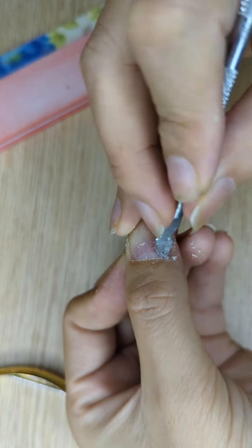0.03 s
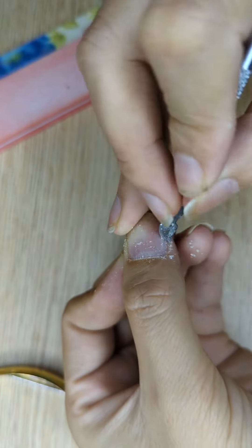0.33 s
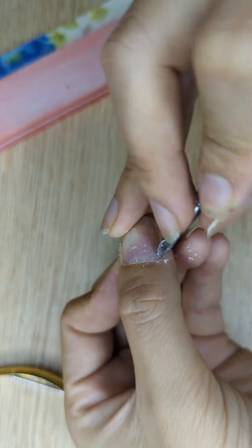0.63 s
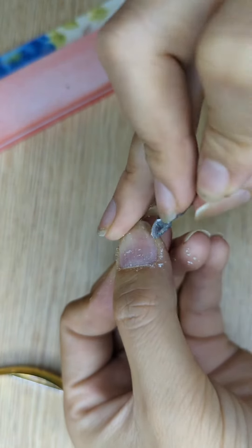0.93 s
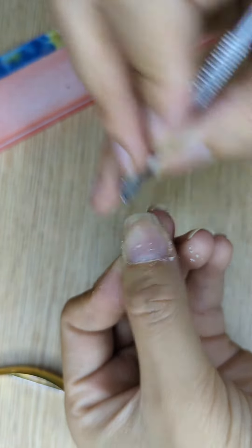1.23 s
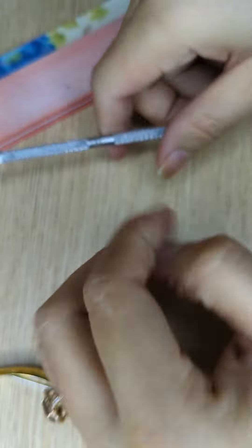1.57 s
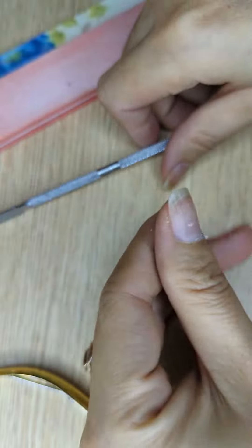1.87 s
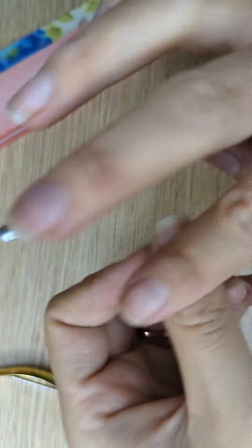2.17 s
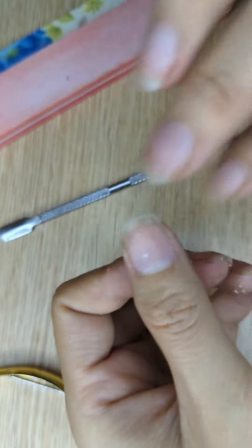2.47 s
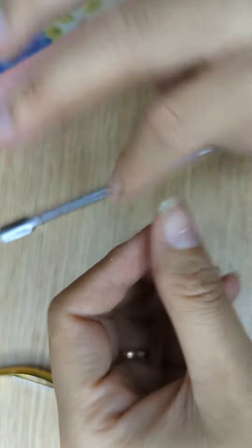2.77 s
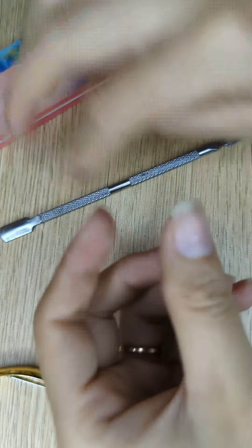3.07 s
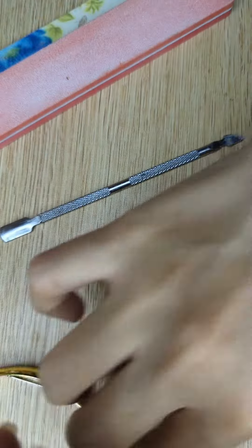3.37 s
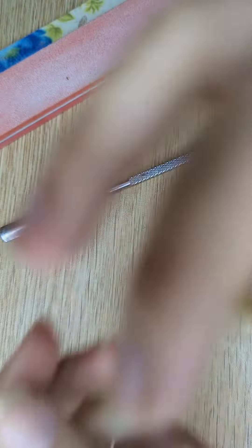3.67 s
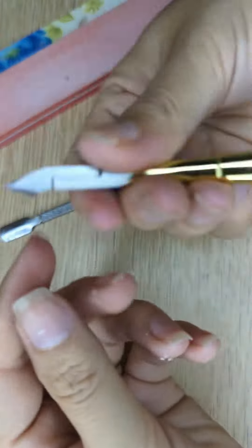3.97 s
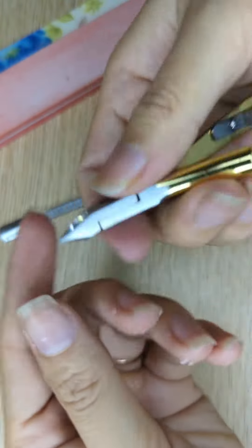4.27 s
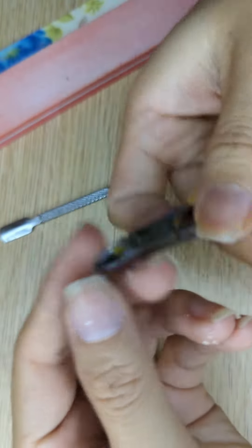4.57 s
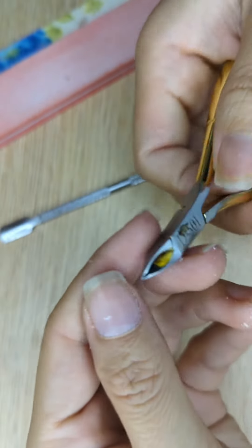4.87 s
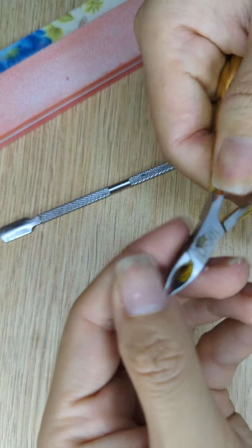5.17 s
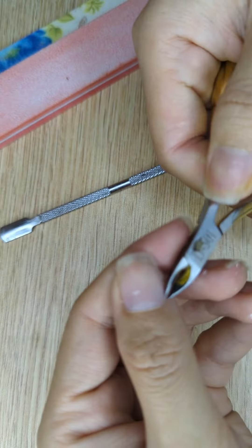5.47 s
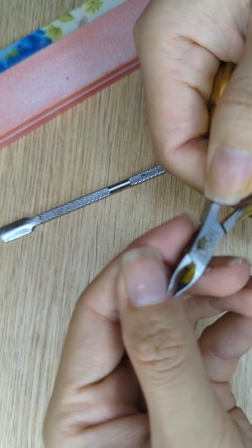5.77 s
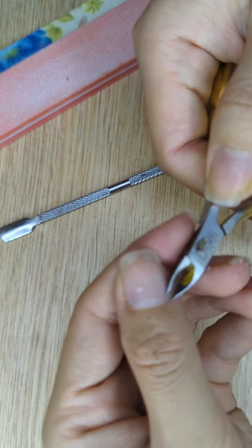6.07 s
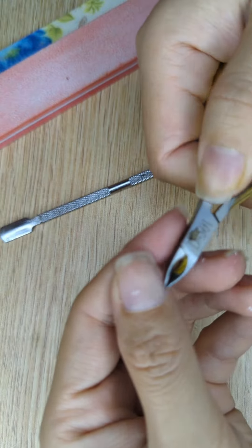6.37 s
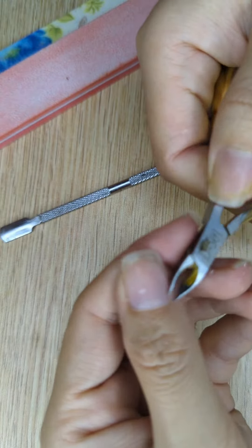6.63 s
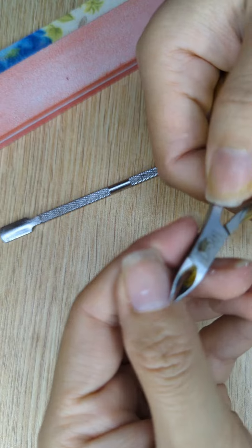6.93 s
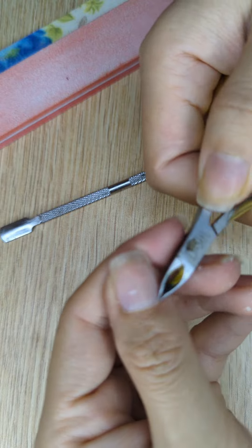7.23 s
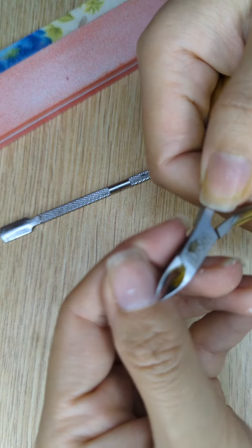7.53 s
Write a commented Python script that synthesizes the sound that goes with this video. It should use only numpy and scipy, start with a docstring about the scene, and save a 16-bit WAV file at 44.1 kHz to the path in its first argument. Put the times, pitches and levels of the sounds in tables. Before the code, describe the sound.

A metal manicure tool scrapes faintly, clatters onto a wooden table, then nippers drag and clink, close by in a quiet room.

```python
"""Faint, short scrapes, close by: a steel pusher works a thumbnail in a manicure at a wooden table.
Put down, the pusher knocks the board and chatters to rest, ringing. Fingertips flick the dust away.
Cuticle nippers are dragged off the table in stick-slip, then shift in the hand with a bright clink.
A low hum, faint far tones and the rumble of a small room lie underneath."""
import sys
import numpy as np
from scipy import signal
from scipy.fft import rfft, irfft, next_fast_len
from scipy.io import wavfile
from scipy.ndimage import uniform_filter1d, map_coordinates

SR = 44100
rng = np.random.default_rng(int(sys.argv[2]) if len(sys.argv) > 2 else 0)


def wav_record(signal):
    """Record a signal, one row per channel, as 16-bit PCM in the file named by sys.argv[1]."""
    frames = np.transpose(np.atleast_2d(signal))
    bounded = np.clip(frames, -1, 1)
    # unit amplitude maps onto the largest positive 16-bit level
    quanta = np.round(bounded * 32767).astype(np.int16)
    wavfile.write(sys.argv[1], SR, quanta)


N = 335160
TIME = np.arange(N) / SR
AGE = TIME[:SR // 4]  # s since a contact

# tool blows on the table, the pusher rocking end to end: start_s, knock_db, board_db, steel_db
TABLE_BLOWS = [(1.452, -45, -54, -79), (1.8704, -17.5, -26.5, -54), (2.0071, -11, -23, -48.5),
               (2.0252, -27, -30.5, -24), (2.034, -17.5, -27, -23), (2.0421, -25, -34, -28.5),
               (2.0473, -27, -38, -27), (2.0523, -24, -32, -29), (2.059, -23, -29, -28),
               (2.07, -25.5, -29.5, -35.5), (2.0782, -28, -30.5, -43.5), (2.0865, -32, -33.5, -38.5),
               (2.091, -35, -39.5, -41.5), (2.1, -36, -38, -47), (2.108, -41, -47, -51.5)]
# left-right likeness of near sounds: freq_hz, correlation
NEAR_LIKENESS = [(100, 1), (250, 0.9), (550, 0.48), (1200, -0.5), (4000, -0.092), (10000, 0.0018)]


def nail_scrapes():
    """The pusher rasps on the nail; its blade sings as it presses harder."""
    scrapes = [(0.087, .014, -72, -76), (.174, 0.011, -71.5, -79), (.279, 0.015, -72.5, -82),
               (0.368, .008, -68.5, -79), (0.482, 0.013, -67.5, -80), (.579, 0.011, -76, -77),
               (0.894, .022, -73, -77), (1.087, 0.019, -69, -64), (1.142, 0.025, -67, -63),
               (1.23, 0.017, -56.5, -59)]  # centre_s, length_s, rasp_db, blade_db
    rasp_spectrum = [(1500, -6), (4000, -4), (7500, -6), (9100, -3.5), (10300, -5), (12400, 3), (13800, -5),
                     (16000, -6)]  # freq_hz, level_db
    blade_spectrum = [(8000, -33.5), (9100, -15), (10200, -34.5), (11500, -10.5), (12300, -21), (13000, 0),
                      (13800, -24.5), (16000, -34)]  # freq_hz, level_db
    rasp = strokes([(s, length, db) for s, length, db, _ in scrapes], rasp_spectrum, grain_db=3, edge=5)
    blade_strokes = [(s, length, db) for s, length, _, db in scrapes]
    return rasp + strokes(blade_strokes, blade_spectrum, grain_db=1, edge=9)


def table_blows(buzz_db=-2.5):
    """Each blow knocks the wood and rings board and pusher; the steel buzzes while it touches."""
    board_modes = [(146, -7.5, 0.25), (215, 0, .12), (249, 3.5, 0.097), (360.6, -7, 0.095),
                   (588.3, -4.5, .14), (708.6, 2, 0.082), (956, -11, 0.14), (1100, -16, .06),
                   (1389, -4.5, .075), (1990, 0, .075), (2354, -9.5, 0.09), (2720, -10.5, 0.079),
                   (3080, -11, 0.098), (4490, -13.5, .09)]  # pitch_hz, level_db, t60_s
    tip_modes = [(1427, -4, .03), (1960, -2, 0.027), (2400, -0.5, 0.046), (2730, -1, .055), (3180, -4, .03),
                 (4307, -5, 0.034)]  # pitch_hz, level_db, t60_s
    tip_rebounds = [(1.8707, -21), (1.8764, -26.5), (2.0085, -15), (2.0123, -19.5)]  # start_s, level_db
    knock_spectrum = [(40, -30), (100, -5.5), (180, 1.5), (280, 0), (450, 0), (900, 0.5), (1400, 2.5),
                      (1650, -7), (2000, 0.5), (2900, -1), (3700, -9), (4700, -10), (5700, -17.5),
                      (12000, -29), (15000, -49)]  # freq_hz, level_db
    buzz_spectrum = [(2500, -26), (4500, -6), (6300, 3.5), (7500, -4.5), (10000, -8), (13000, -10.5),
                     (14500, -42)]  # freq_hz, level_db
    rings, knock_power, buzz_power = np.zeros((2, N)), np.zeros(N), np.zeros(N)
    for s, knock_db, board_db, steel_db in TABLE_BLOWS:
        add(knock_power, s, (amp(knock_db) * contact(hold_s=.003, t60_s=.036, attack_s=.0004)) ** 2)
        touch = amp(steel_db + buzz_db) * contact(hold_s=.002, t60_s=.04, attack_s=.0005)
        add(buzz_power, s, touch ** 2)
        add(rings, s, amp(board_db) * ring(board_modes, blur_hz=40.07))
    for s, db in tip_rebounds:
        add(rings, s, amp(db) * ring(tip_modes, blur_hz=40))
    knock = np.sqrt(knock_power) * noise(knock_spectrum)
    steel = pusher_ring(blur_hz=18)
    buzz = np.sqrt(buzz_power) * friction(buzz_spectrum, grain_db=2)
    return rings + steel + knock + buzz


def pusher_ring(blur_hz):
    """Each mode of the steel rod stores the energy of successive blows and sings between them."""
    modes = [(3720, -5.5, .11), (5930, -15, .1), (6175, -13, .11), (7084, -14, .1), (9260, -17.5, 0.083),
             (11260, -1, 0.055), (12230, -11.5, .065), (12860, -3, 0.041), (14700, -18, .02)]  # pitch_hz, level_db, t60_s
    out = np.zeros((2, N))
    channel_phase = np.array([[0], [np.pi / 2]])
    for hz, db, t60_s in modes:
        energy = np.zeros(N)
        for s, _, _, steel_db in TABLE_BLOWS:
            add(energy, s, (amp(db + steel_db) * contact(hold_s=0, t60_s=t60_s, attack_s=.0008)) ** 2)
        walk = np.cumsum(uniform_filter1d(rng.standard_normal(N), size=64))
        drift = walk * np.sqrt(2 * np.pi * blur_hz / SR)
        out += np.sqrt(energy) * np.sin(2 * np.pi * hz * TIME + drift + channel_phase)
    return out


def nipper_drag(start_s=3.418, end_s=3.531, slip_hz=(300.9, 155.3), jitter=.3, roughness=1.5):
    """Steel sticks and slips on the grain; slowing slips drive the tabletop, catches grind harder."""
    table_modes = [(162.3, 46, -13.5, -0.5), (290.5, 43, 5, 4), (536, 100, -8, -2), (690, 60, 2.5, 4.5),
                   (810, 45, 4, -6.5), (912, 35, 2.5, -4.5), (1137, 110, -7, -5), (1930, 150, -26, -9.5)]  # pitch_hz, width_hz, start_db, end_db
    catches = [(3.43, 0.012, -35.5), (3.501, 0.016, -33), (3.53, 0.011, -40)]  # centre_s, length_s, level_db
    grit_spectrum = [(500, -26.5), (1300, 2.5), (2000, 0), (3200, -8), (6500, -14), (9000, -15),
                     (15500, -22.5)]  # freq_hz, level_db
    pull_db, grit_db, catch_drive_db = -25.5, -47, 2
    pull = held(start_s, end_s, attack_s=.0145, release_s=.1)
    catch = pull * sum(amp(db) * swell(s, length, edge=3.8) for s, length, db in catches)
    rate_hz = np.interp(TIME, [start_s, end_s], slip_hz)
    cycles = np.cumsum(rate_hz * np.exp(jitter * wobble(250))) / SR
    slips = unit(np.diff(np.floor(cycles), prepend=0) * amp(2.8 * wobble(200)))
    force = slips + roughness * noise([(200, -3.5), (700, 1.5)])
    travel = np.interp(TIME, [start_s, end_s], [0, 1])  # the moving contact shifts the mode balance
    first = resonate(force, [(hz, width, db) for hz, width, db, _ in table_modes])
    last = resonate(force, [(hz, width, db) for hz, width, _, db in table_modes])
    tabletop = ((1 - travel) * first + travel * last) * amp([[-.9], [.9]])
    after_slip = np.exp(-.7 * (cycles % 1))
    grit = unit(friction(grit_spectrum, grain_db=-.5) * after_slip)
    slide = held(start_s, end_s, attack_s=.0092, release_s=.17)  # grit outlasts the pull
    drive = amp(pull_db) * pull + amp(catch_drive_db) * catch
    return drive * tabletop + (amp(grit_db) * slide + catch) * grit


def steel_clicks(mute_after_s=.012, mute_t60_s=.042):
    """Hard contacts give a bright tick and a dull snap; the steel rings until fingers mute it."""
    clicks = [(1.295, -57, -57.5, -84), (1.7895, -45.5, -53.5, -72), (1.8702, -37.5, -30, -54),
              (2.007, -31, -26.5, -52.5), (3.195, -57, -59.5, -78), (3.38, -73, -58, -85),
              (3.8213, -26, -37, -36), (3.8239, -15.5, -37.5, -37.5), (3.8293, -29.5, -48.5, -28),
              (3.843, -29, -59.5, -39), (3.8516, -34, -42, -43.5), (4.0935, -39, -51.5, -57),
              (4.1, -41, -59, -67), (4.3071, -54.5, -61, -72), (4.58, -51, -42, -61)]  # start_s, tick_db, snap_db, ring_db
    nipper_modes = [(1520, -21, .06), (1900, -22, .07), (3080, -14, 0.09), (4330, -16, 0.049),
                    (7370, -4, .058), (8640, 1, 0.065), (10400, -11.5, 0.054), (11300, -7.5, .049),
                    (12060, -5, .06), (14300, 2, .11), (14690, -5, .07), (15450, 1.5, .07)]  # pitch_hz, level_db, t60_s
    tick_spectrum = [(600, -53.5), (1500, -13.5), (3200, -14.5), (6200, -14), (8500, -3), (12500, 2),
                     (14500, -1.5), (16500, 0)]  # freq_hz, level_db
    snap_spectrum = [(950, -28), (1500, -0.5), (3000, 1), (5200, -3), (8000, -11), (16000, -20)]  # freq_hz, level_db
    rings, tick_power, snap_power = np.zeros((2, N)), np.zeros(N), np.zeros(N)
    touch = contact(hold_s=.0017, t60_s=.023, attack_s=.0005)
    muting = fade(np.maximum(AGE - mute_after_s, 0), mute_t60_s)
    for s, tick_db, snap_db, ring_db in clicks:
        add(tick_power, s, (amp(tick_db) * touch) ** 2)
        add(snap_power, s, (amp(snap_db) * touch) ** 2)
        add(rings, s, amp(ring_db) * muting * ring(nipper_modes, blur_hz=44.65))
    ticks = np.sqrt(tick_power) * noise(tick_spectrum)
    snaps = np.sqrt(snap_power) * noise(snap_spectrum)
    return rings + ticks + snaps


def steel_skids(bite_s=3.429, bite_length_s=.016, bite_db=-38):
    """Steel tips skid over the wood; the nipper jaws grate as they first bite in."""
    skids = [(1.9, 0.012, -44.5), (1.93, 0.028, -56), (3.505, 0.043, -37)]  # centre_s, length_s, level_db
    skid_spectrum = [(1000, -15), (1600, -11), (1950, 0), (2250, -3.5), (2800, 2), (3500, -17),
                     (4250, -8.5), (5700, -22.5), (6350, -11), (7200, -25), (12000, -32)]  # freq_hz, level_db
    jaw_spectrum = [(2600, -21.5), (3350, -6), (3550, 4), (3780, -11), (4000, -2), (4400, -8), (5100, -18),
                    (7000, -27), (14000, -18)]  # freq_hz, level_db
    tips = strokes(skids, skid_spectrum, grain_db=2, edge=4.7)
    return tips + strokes([(bite_s, bite_length_s, bite_db)], jaw_spectrum, grain_db=2, edge=10)


def hand_bumps(low_hz=141.6, high_hz=226, t60_s=.046):
    """A soft hand moves only the table's lowest modes."""
    bumps = [(1.222, -41), (1.456, -37.5), (1.986, -42.5), (3.381, -30), (3.4, -38), (3.561, -36),
             (4.585, -26), (4.602, -34.5)]  # start_s, level_db
    out = np.zeros(N)
    modes = np.sin(2 * np.pi * low_hz * AGE) + .73 * np.sin(2 * np.pi * high_hz * AGE)
    for s, db in bumps:
        add(out, s, -amp(db) * modes * fade(AGE, t60_s))
    return out


def finger_flicks(flick_s=.022, snag_s=.0033, ridge_db=4):
    """Fingertips flick dust off the nail; skin ridges catch in turn, and the nail's edge snags."""
    flicks = [(2.271, -59.5), (2.418, -55.5), (2.594, -53.5), (2.756, -54), (2.89, -56.5), (3.048, -50.5)]  # centre_s, level_db
    snags = [(2.889, -49), (3.055, -44)]  # centre_s, level_db
    skin_spectrum = [(2000, -20.5), (5000, -16), (9000, -13), (10800, -9.5), (12100, -2.5), (13500, -6.5),
                     (15200, -6), (16500, -19.5)]  # freq_hz, level_db
    ridges = unit(amp(ridge_db * wobble(1800)))
    wiping = strokes([(s, flick_s, db) for s, db in flicks], skin_spectrum, grain_db=0, edge=6.9)
    snagging = strokes([(s, snag_s, db) for s, db in snags], skin_spectrum, grain_db=-.5, edge=5)
    return ridges * wiping + snagging


def handling(start_s=1.85, end_s=4.5, rustle_db=-79, arms_db=-58):
    """Skin slides on the handles, hands brush and rustle, forearms rumble on the table."""
    handle_rubs = [(1.57, 0.023, -72), (2.155, 0.022, -66.5), (3.25, 0.058, -68), (4.032, 0.06, -58.5),
                   (4.183, 0.043, -66.5), (4.239, 0.021, -57.5), (4.599, 0.024, -54), (4.65, 0.057, -62.5)]  # centre_s, length_s, level_db
    palm_brushes = [(1.215, 0.073, -56.5), (2.54, 0.092, -54), (2.76, 0.0592, -56), (2.97, 0.078, -61.5),
                    (3.95, 0.095, -61.5), (4.685, .019, -53.5), (6.71, .04, -64)]  # centre_s, length_s, level_db
    grip_spectrum = [(1200, -8.5), (4000, 0), (7000, -4.5), (10000, -2.5), (15500, -8)]  # freq_hz, level_db
    palm_spectrum = [(200, -4.5), (600, 17), (2100, 12), (4000, -6), (12000, -36)]  # freq_hz, level_db
    arm_spectrum = [(20, -5), (35, 0.5), (55, 2), (110, -13.5), (250, -48.5)]  # freq_hz, level_db
    rubs = strokes(handle_rubs, grip_spectrum, grain_db=2, edge=6.5)
    brushes = strokes(palm_brushes, palm_spectrum, grain_db=3, edge=5.5)
    busy = held(start_s, end_s, attack_s=1.6, release_s=1.1)
    rustle = busy * amp(rustle_db + 2.2 * wobble(18)) * friction(grip_spectrum, grain_db=3)
    leaning = held(0, end_s, attack_s=1, release_s=1)
    arms = leaning * amp(arms_db + 2.9 * wobble(4.1)) * noise(arm_spectrum)
    return rubs + brushes + rustle + arms


def room_tail(x):
    """Short reverberation, 10 ms late; the high treble dies first."""
    decay = [(150, 0.45), (700, 0.15), (2500, 0.29), (6000, 0.2), (14000, 0.11)]  # freq_hz, t60_s
    hz, t, bins = signal.stft(rng.standard_normal((2, SR // 2)), SR, nperseg=256)
    tail = signal.istft(bins * fade(t, along(decay, hz)[:, None]), SR, nperseg=256)[1]
    tail = np.pad(tail / np.linalg.norm(tail[0]), ((0, 0), (SR // 100, 0)))
    return signal.fftconvolve(x, tail, axes=1)[:, :N]


def background(rumble_db=-51):
    """Room rumble and air, a steady hum, far wavering tones and hollow swells."""
    rumble_spectrum = [(16, -41.5), (24, -22), (40, -1), (58, 3), (105, -4), (180, -6.5), (240, -2.5),
                       (310, -9), (420, -20.5), (600, -53.5)]  # freq_hz, level_db
    air_spectrum = [(250, -26), (400, -7.5), (480, -10), (560, -1), (700, -2), (950, -14.5), (1200, -13),
                    (1500, -9.5), (1850, -18), (2900, -21.5), (3500, -30.5), (5000, -38), (9000, -50),
                    (16000, -61)]  # freq_hz, level_db
    air_contour = [(0.0, -62.5), (0.72, -61.5), (2.52, -58), (4.76, -59.5), (7.6, -61)]  # time_s, relative_db
    likeness = [(100, 0.81), (300, 0.75), (700, 0.28), (1500, 0.31), (4000, 0.069)]  # freq_hz, left_right_correlation
    hum_bands = [(78.7, -57, 11), (141.7, -53, 12)]  # pitch_hz, level_db, width_hz
    far_tones = [(.92, 0.26, 251.1, -0.5, -55.5), (5.682, 0.3498, 296.4, 0, -57), (5.69, .2, 192, 0, -55.5),
                 (6.399, .5, 314.2, 35, -56)]  # centre_s, length_s, pitch_hz, glide_hz_per_s, level_db
    hollow_swells = [(2.29, .12, 620, -57), (2.682, .27, 595, -55), (3.032, .09, 590, -56),
                     (3.249, .18, 575, -57), (3.94, .11, 700, -57.5)]  # centre_s, length_s, pitch_hz, level_db
    rumble = amp(rumble_db + 1.8 * wobble(4.7)) * noise(rumble_spectrum, likeness)
    air_db = np.interp(TIME, *np.transpose(air_contour)) + 1.51
    air = amp(air_db + .63 * wobble(13)) * noise(air_spectrum, likeness)
    hum = sum(amp(db) * noise_band(hz, width) for hz, db, width in hum_bands)
    far = sum(amp(db) * swell(s, length, edge=3) * noise_band(hz + glide * (TIME - s), width_hz=35)
              for s, length, hz, glide, db in far_tones)
    hollow = sum(amp(db) * swell(s, length, edge=5) * noise_band(hz, width_hz=100)
                 for s, length, hz, db in hollow_swells)
    return rumble + air + hum + far + hollow


def ring(modes, blur_hz):
    """Struck modes, blurred by the shifting contact; short waves differ in phase left and right."""
    hz, db, t60_s = np.transpose(modes)[:, :, None]
    gain = amp(db + 1.5 * rng.standard_normal((2, len(hz), 1)))
    phase = rng.uniform(-np.pi, np.pi, gain.shape) * np.minimum(hz / 900, 1) ** 2
    width_hz = blur_hz * np.minimum(hz / 5000, 1)
    walk = np.cumsum(rng.standard_normal((len(hz), len(AGE))), axis=1)
    drift = uniform_filter1d(walk * np.sqrt(2 * np.pi * width_hz / SR), size=64, axis=1)
    partials = gain * fade(AGE, t60_s) * np.sin(2 * np.pi * hz * AGE + phase + drift)
    return partials.sum(axis=0 + 1) * (1 - np.exp(-AGE / .00068))


def resonate(x, peaks):
    """x through resonances of alternating sign, at rms 1."""
    def response(f):
        return sum((-1) ** k * amp(db) * 1j * f * width_hz / (hz * hz - f * f + 1j * f * width_hz)
                   for k, (hz, width_hz, db) in enumerate(peaks))
    return unit(filtered(x, response))


def strokes(rows, spectrum, grain_db, edge):
    """Friction swells and dies with the speed of each stroke."""
    envelope = sum(amp(db) * swell(s, length_s, edge) for s, length_s, db in rows)
    return envelope * friction(spectrum, grain_db)


def friction(spectrum, grain_db):
    """Countless tiny catches of uneven size."""
    return stereo(rng.standard_normal((2, N)) * amp(grain_db * wobble(550)), spectrum, NEAR_LIKENESS)


def noise(spectrum, likeness=NEAR_LIKENESS):
    """Steady coloured stereo noise."""
    return stereo(rng.standard_normal((2, N)), spectrum, likeness)


def stereo(pair, spectrum, likeness):
    """Two unrelated signals to a coloured left and right, rms 1."""
    def response(hz):
        angle = np.arccos(np.clip(along(likeness, hz), -1, 1)) / 2
        return amp(along(spectrum, hz)) * [np.cos(angle), np.sin(angle)]
    mid, side = filtered(pair, response)
    return unit(np.array([mid + side, mid - side]))


def noise_band(hz, width_hz):
    """Narrow noise about a pitch that may glide."""
    phase = 2 * np.pi * np.cumsum(hz * np.ones(N)) / SR
    return wobble(width_hz) * np.sin(phase) + wobble(width_hz) * np.cos(phase)


def contact(hold_s, t60_s, attack_s):
    """Envelope: steady while the surfaces grind, then decaying."""
    return fade(np.maximum(AGE - hold_s, 0), t60_s) * (1 - np.exp(-AGE / attack_s))


def swell(centre_s, length_s, edge):
    """Rise and fall; a higher edge is crisper."""
    return 1 / np.sqrt(1 + np.abs(2 * (TIME - centre_s) / length_s) ** edge)


def held(start_s, end_s, attack_s, release_s):
    """Full level from start to end; attack and release each span 60 dB."""
    return fade(np.maximum(start_s - TIME, 0), attack_s) * fade(np.maximum(TIME - end_s, 0), release_s)


def fade(t, t60_s):
    """Exponential decay."""
    return np.exp(-np.log(1000) * t / t60_s)


def wobble(rate_hz):
    """Smooth random curve."""
    knots = np.random.default_rng(rng.integers(2 ** 31)).standard_normal(int(N * rate_hz / SR) + 4)
    return map_coordinates(knots, [TIME * rate_hz])


def filtered(x, response):
    """x through a frequency response."""
    size = x.shape[-1]
    padded = next_fast_len(size + 8192)
    return irfft(rfft(x, padded) * response(np.fft.rfftfreq(padded, 1 / SR)), padded)[..., :size]


def along(points, hz):
    """Interpolate on a log frequency axis."""
    knots_hz, values = np.transpose(points)
    return np.interp(np.log(hz + 1), np.log(knots_hz + 1), values)


def add(track, start_s, sound):
    """Mix in place."""
    part = track[..., round(start_s * SR):][..., :sound.shape[-1]]
    part += sound[..., :part.shape[-1]]


def amp(db):
    """Decibels to gain."""
    return 10 ** (np.asarray(db) / 20)


def unit(x):
    """Scale to rms 1."""
    return x / np.sqrt(np.mean(x ** 2) + 1e-20)


def scene():
    """Tools and hands close by, in a small room."""
    balance = [(150, 1.5), (350, 2), (750, 0), (1200, -1.5), (2200, 3.5), (6000, 1), (10000, 3.5),
               (14000, -1)]  # freq_hz, left_minus_right_db
    tools = table_blows() + hand_bumps() + nipper_drag() + steel_clicks() * amp([[.4], [-.4]])
    near = tools + steel_skids() + nail_scrapes() + finger_flicks() + handling()
    near = filtered(near, lambda hz: amp(np.outer([1, -1], along(balance, hz)) / 2))
    return near + amp(-29.5) * room_tail(near) + background() * amp([[.8], [-.8]])


def record(dry):
    """Steep low-pass."""
    cutoff_hz = 16100
    return filtered(dry, lambda hz: 1 / np.sqrt(1 + (hz / cutoff_hz) ** 160))


dry = scene()
out = record(dry)
wav_record(out)
```